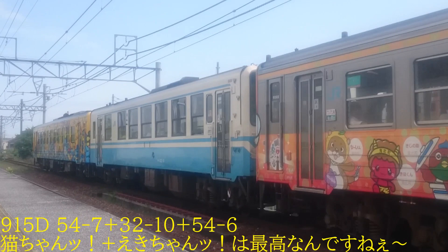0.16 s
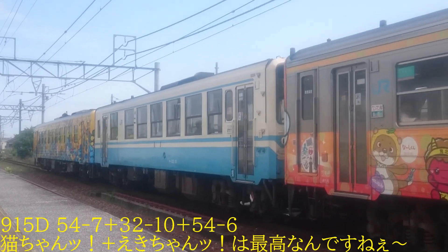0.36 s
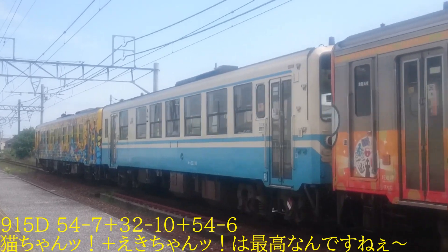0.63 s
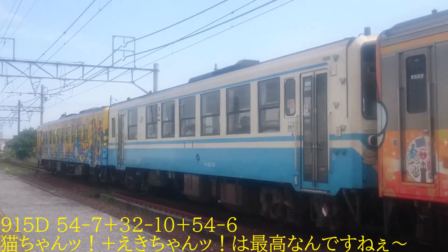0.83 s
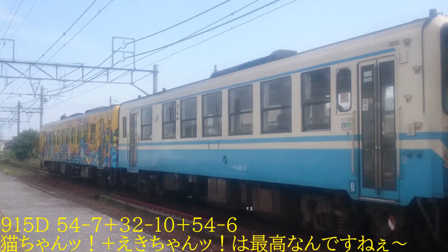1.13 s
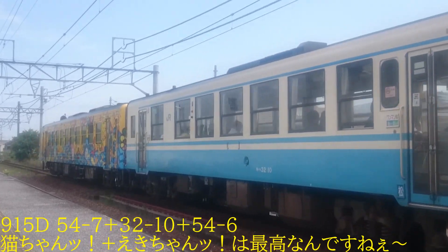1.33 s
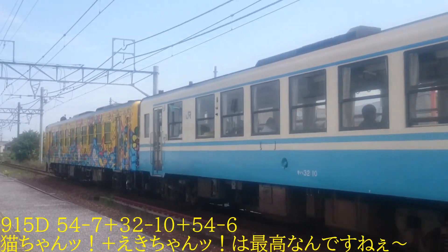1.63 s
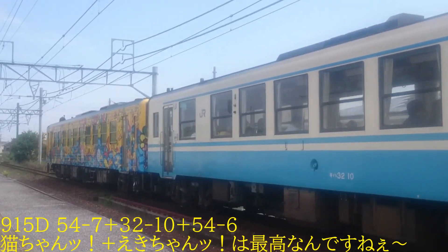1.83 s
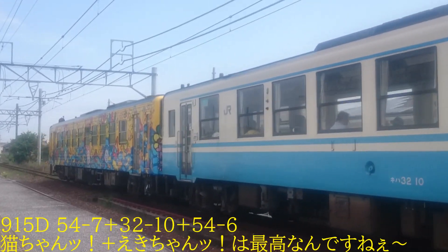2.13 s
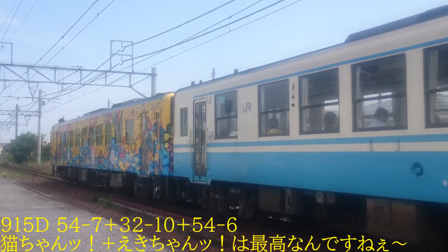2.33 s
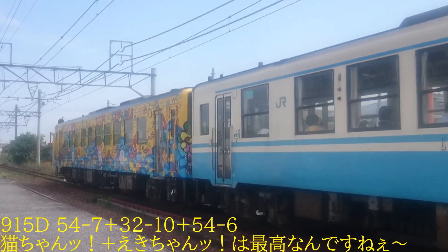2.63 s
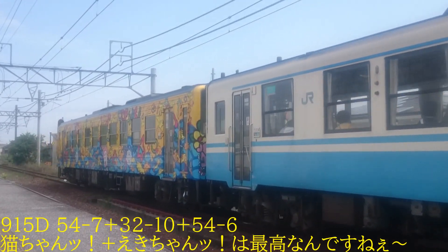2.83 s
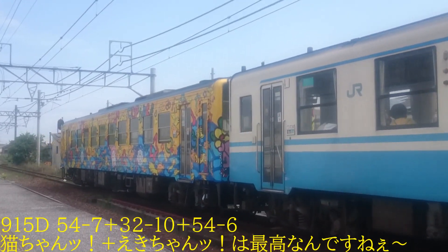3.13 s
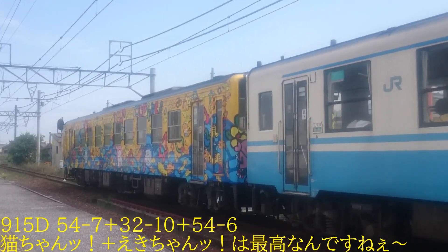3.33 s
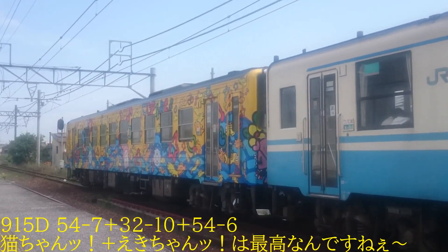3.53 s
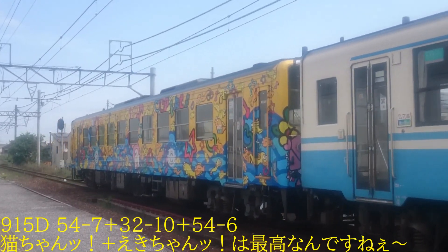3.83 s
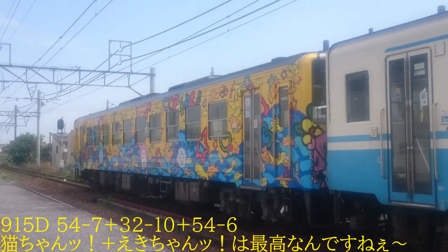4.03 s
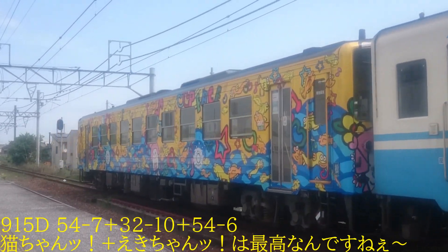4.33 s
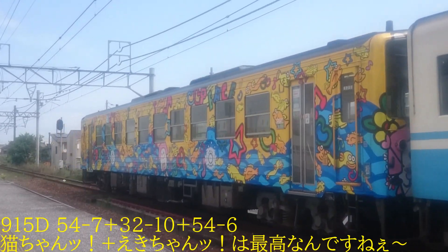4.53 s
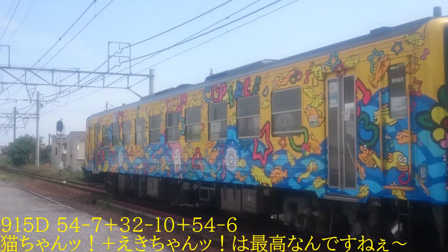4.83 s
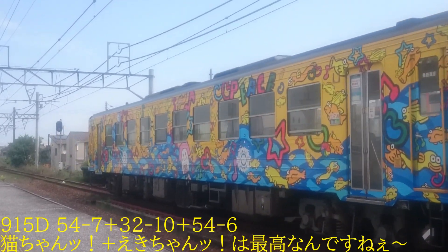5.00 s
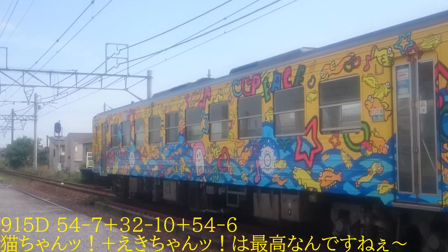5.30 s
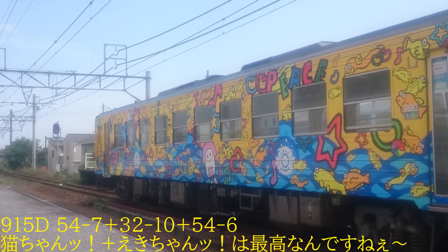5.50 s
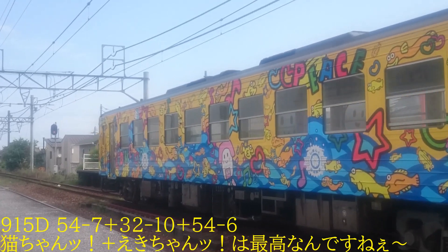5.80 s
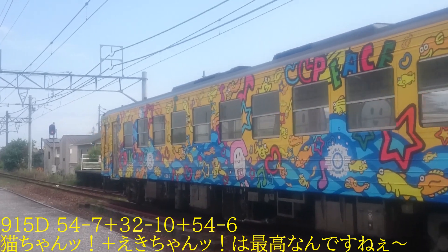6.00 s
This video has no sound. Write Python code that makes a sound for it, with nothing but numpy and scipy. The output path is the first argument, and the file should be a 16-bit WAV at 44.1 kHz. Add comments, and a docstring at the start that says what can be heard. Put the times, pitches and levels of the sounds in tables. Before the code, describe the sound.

Outdoors beside the track, a slowing diesel railcar train passes close to a stereo microphone. A loud, gritty engine roar with low exhaust booms and a few thumps comes first, then drops away to faint rolling noise. A rough, piercing wheel squeal swells up around one second and stays, fluttering and cutting out briefly, stronger on the left and slightly overloaded, with a buzzing chatter near the end.

```python
"""The wheels of a braking diesel railcar train squeal on one high mode close to a pair of microphone ports:
a thin tone in a rough halo of noisy modes, its octave, and sidebands when a brake block chatters.
Shaped noise makes the roar of an engine car that gives way to rolling noise, and the hiss of the brakes.
Wavering tones make exhaust drones, brief whines and one low drone; short damped rings make thumps and knocks.
The left port rings near the squeal and overloads."""
import sys
import numpy as np
from scipy import signal
from scipy.fft import next_fast_len
from scipy.io import wavfile
from scipy.ndimage import uniform_filter1d

SR = 44100
rng = np.random.default_rng(int(sys.argv[2]) if len(sys.argv) > 2 else 0)


def unload_wav(signal):
    """Save mono or channel-first audio to the path in sys.argv[1] as 16-bit WAV at rate SR, clipped to [-1, 1]."""
    wavfile.write(
        sys.argv[1],
        SR,
        np.round(np.clip(np.atleast_2d(signal).T, -1, 1) * 32767).astype(np.int16),
    )


def field_ratio(decibels):
    """Amplitude ratio for a level in dB (20 dB per decade); scalars and array-likes work."""
    return 10 ** (np.asarray(decibels, dtype=float) / 20)


N = 271656
TIME = np.arange(N) / SR
HOP = 256  # samples between noise frames
FRAMES, HZ = N // HOP + 5, np.fft.rfftfreq(1024, 1 / SR)
SQUEAL_LEAD, SQUEAL_ALIKE = 2.6, 0.65  # phase of the left port ahead in radians, likeness of the ports 0-1


def evened(x):
    """Scales to rms 1."""
    return x / np.sqrt(np.mean(abs(x) ** 2) + 1e-20)


def slow_unit(x):
    """Divides out the level over a quarter second, so that only faster beats remain."""
    return x / np.sqrt(uniform_filter1d(abs(x) ** 2, size=11000, axis=-1))


def read(points, hz):
    """Reads a spectrum table on a log-frequency axis."""
    f, value = np.transpose(points)
    return np.interp(np.log(hz + 1), np.log(f + 1), value)


def curves(rows, t):
    """Every column of a table, joined by straight lines in time."""
    s, *columns = np.transpose(rows)
    return [np.interp(t, s, c) for c in columns]


def swells(rest_db, rows, column):
    """Adds bell-shaped swells to the power of a resting level; rows start with center and length in seconds."""
    power = field_ratio(rest_db) ** 2 * np.ones(N)
    for row in rows:
        bell_db = row[column] - 24 * ((TIME - row[0]) / row[1]) ** 2
        power = power + field_ratio(bell_db) ** 2
    return 10 * np.log10(power)


def wobble(width_hz):
    """Complex noise of rms 1, smoothed twice: the envelope of noise in a resonance."""
    r = np.exp(-np.pi * width_hz / SR)
    z = rng.standard_normal(N) + 1j * rng.standard_normal(N)
    return evened(signal.lfilter([1], np.convolve([1, -r], [1, -r]), z))


def turning(hz):
    """A complex tone that follows a frequency."""
    return np.exp(2j * np.pi * np.cumsum(hz * np.ones(N)) / SR)


def ports(hz):
    """Complex gains of the two ports and their likeness, scaled so that the mean of the ports has power 1."""
    # Each row: frequency in Hz, level of the left port over the right in dB
    balance = [(60, -2.5), (200, -6.5), (500, -9.5), (1300, -7.5), (2400, -6.5), (3500, -3), (4500, -9.5),
               (5600, -7.5), (7500, 11), (9500, 15), (10800, -20), (12000, -35), (15000, -12)]
    # Each row: frequency in Hz, likeness of the ports from 0 to 1
    likeness = [(60, 0.66), (400, 0.91), (800, 0.89), (1500, 0.71), (3000, 0.07), (6000, 0), (10000, 0.1)]
    # Each row: frequency in Hz, phase of the left port ahead of the right in radians
    lead = [(0, 2.8), (260, 2.75), (950, 2.1), (1890, -.5), (3600, -4.1), (6600, -9.6), (11000, -24),
            (16000, -40)]
    left = field_ratio(read(balance, hz) / 2) * np.exp(1j * np.interp(hz, *np.transpose(lead)))
    right = 1 / abs(left)
    alike = np.clip(read(likeness, hz), 0, 1)
    mean = np.sqrt(abs(left) ** 2 + right ** 2 + 2 * alike * right * left.real) / 2
    return left / mean, right / mean, alike


def narrow(hz, sound):
    """Places one narrow complex sound on the two ports."""
    left, right, _ = ports(hz)
    return np.sqrt(2) * np.array([left * sound, right * sound]).real


def panned(db, pan_db):
    """Left and right gains of a squeal layer whose mean over the ports has the given level."""
    right = field_ratio(-pan_db)
    mean = np.sqrt(1 + right ** 2 + 2 * SQUEAL_ALIKE * np.cos(SQUEAL_LEAD) * right) / 2
    return field_ratio(db) * np.array([np.ones_like(right), right]) / mean


def noise(field_db, patchy_db):
    """Noise of a given level over frequency and time, with drifting patches, heard by both ports."""
    a, b, c, d, patches = rng.standard_normal((FRAMES, len(HZ), 5)).T
    patches = evened(uniform_filter1d(uniform_filter1d(patches, size=14, axis=0), size=10, axis=1))
    left, right, alike = (g[:, None] for g in ports(HZ))
    shared, own = a + 1j * b, c + 1j * d
    z = np.array([left * shared, right * (alike * shared + np.sqrt(1 - alike ** 2) * own)])
    z *= field_ratio(field_db + patchy_db * patches) * np.sqrt(3 / 2)  # the root makes up for overlapping windows
    return signal.istft(z, nperseg=1024, noverlap=1024 - HOP)[1][:, :N]


def band_level(db, lo_hz, hi_hz):
    """A spectrum shifted so that one band of it sums to 0 dB."""
    band = db[(HZ > lo_hz) & (HZ < hi_hz)]
    return db - 10 * np.log10(np.sum(field_ratio(band) ** 2))


def roar():
    """Engine roar gives way to rolling noise; the rumble and the hiss of the brake blocks swell on their own."""
    # Each row: time in seconds, roar level in dB, relative level of the rumble in dB
    train = [(0, -23.5, -5), (.41, -25, -1.5), (.93, -22.5, -8), (1.2, -26.5, -5.5), (1.36, -29, -4),
             (1.66, -37, -7), (2.03, -41, -7.5), (2.6, -42, -14.5), (2.92, -41.5, -11), (3.09, -38.5, -11),
             (3.36, -42, -10.5), (4.02, -40, -12), (4.2, -40.5, -9.5), (4.45, -40.5, -10),
             (4.72, -37, -8.5), (4.87, -42.5, -4.5), (5.3, -39.5, -5.5), (5.45, -41, -8.5),
             (6.0, -39.5, -3.5), (6.16, -42, -6.5)]
    # Each row: time in seconds, share of the engine car in the roar from 0 to 1
    nearness = [(0, 0.46), (1.3, 0.58), (2.1, 0.35), (6.16, 0.24)]
    # Spectrum shapes. Each row: frequency in Hz, relative density in dB
    engine_shape, rolling_shape, hiss_shape = [(21, -34), (35, -37), (70, -14), (156, 4.5), (356, -1.5),
                                               (421, 2), (629, -4), (863, -1), (1020, -10.5), (1130, -2.5),
                                               (1260, -5), (2690, -3), (3260, -8), (3770, -3),
                                               (5400, -16.5), (7020, -63), (11900, -120)], [(21, -44), (35, -36), (87, -0.5),
                                                                    (124, -14), (219, -11.5), (282, -7),
                                                                    (387, -9.5), (421, -8.5), (776, -4.5),
                                                                    (958, 1.5), (1290, -5), (3770, -6.5),
                                                                    (4560, -10.5), (4960, -15.5),
                                                                    (5400, -17.5), (7020, -43),
                                                                    (11900, -120)], [(4600, -30),
                                                                                     (5400, -2.5),
                                                                                     (7500, 4),
                                                                                     (9600, -1.5),
                                                                                     (10800, -19),
                                                                                     (12000, -7.5),
                                                                                     (14500, -20),
                                                                                     (15700, -15),
                                                                                     (16000, -85)]
    # Wheels and rail ring. Each row: frequency in Hz, width in Hz, height of the peak in dB
    body_rings = [(458, 28, 7), (920, 20, -4.5), (1120, 27, 4.5), (2407, 99, 4), (2660, 27, 7.5),
                  (3500, 300, 0.5)]
    # Each row: time in seconds, brake hiss over the roar in dB
    brake_hiss = [(0, -14.5), (.8, -15.5), (.97, -10.5), (1.3, -10), (1.8, -15.5), (2.3, -10.5),
                  (2.7, -21.5), (3.1, -14.5), (3.6, -20), (4.2, -17.5), (4.7, -13), (5.2, -23), (6.16, -18)]

    t = np.arange(FRAMES) * HOP / SR
    level_db, rumble_db = curves(train, t)
    flutter = evened(uniform_filter1d(rng.standard_normal(FRAMES), size=9))
    level_db = level_db + 0.63 * flutter
    near = np.clip(curves(nearness, t)[0], 0, 1)
    rings = sum(db / (1 + (2 * (HZ - hz) / width) ** 2) for hz, width, db in body_rings)
    engine = band_level(read(engine_shape, HZ) + rings, 300, 4500)[:, None]
    rolling = band_level(read(rolling_shape, HZ) + rings, 300, 4500)[:, None]
    low = np.clip((1100 - HZ) / 600, 0, 1)[:, None]  # the rumble: whole below 500 Hz, none above 1100 Hz
    body = near * engine + (1 - near) * rolling + low * 0.65 * (rumble_db - rumble_db.mean())
    hiss = band_level(read(hiss_shape, HZ), 8300, 10000)[:, None] + curves(brake_hiss, t)[0]
    return noise(body + level_db, patchy_db=1.04) + noise(hiss + level_db, patchy_db=1.1)


def exhaust():
    """Low firing orders of the engine, each a wavering drone that booms up briefly."""
    # Each row: frequency in Hz, width of the wavering in Hz
    drones = [(72, 8.2), (97, 37)]
    # Each row: time in seconds, relative levels of the low and the high drone in dB
    drone_levels = [(0, -60, -45.5), (1.4, -52, -43), (1.75, -57, -54), (2.2, -64.5, -77),
                    (2.55, -78, -70.5), (3.15, -58, -58), (3.9, -73, -70), (4.6, -67, -56), (5.2, -71, -61),
                    (6.16, -55, -55.5)]
    # Each row: center in seconds, length in seconds, relative levels of the low and the high drone in dB
    booms = [(0.113, 0.11, -27.5, -47), (.41, .08, -38, -55), (0.812, 0.087, -48, -40),
             (1.127, .14, -40, -54), (5.31, .14, -66, -52.5), (5.62, 0.093, -77, -45),
             (5.894, 0.11, -49, -56.5)]
    out = np.zeros((2, N))
    for k, ((hz, width), rest_db) in enumerate(zip(drones, curves(drone_levels, TIME))):
        level = field_ratio(swells(rest_db, booms, column=2 + k) - 1.0)
        out += narrow(hz, level * (1.13 + 0.79 * wobble(width)) * turning(hz))
    return out


def tone_and_halo():
    """Envelopes of the squeal at both ports: a thin tone, and other wheels that beat against it as a halo."""
    # Each row: time in seconds, relative levels of the thin tone and of the rough halo in dB
    levels = [(0, -42, -32), (.5, -37.5, -33.5), (.62, -42, -26.5), (1.0, -29, -18), (1.45, -18.5, -17.5),
              (1.62, -15, -17.5), (1.84, -32, -19), (1.94, -14, -16.5), (2.45, -14.5, -19),
              (2.65, -27.5, -17.5), (3.0, -24, -19.5), (3.75, -21, -18), (4.0, -24, -19),
              (4.35, -23.5, -18.5), (4.85, -17, -21.5), (5.0, -24, -19), (5.2, -24.5, -18.5),
              (5.5, -23.5, -20), (6.16, -26, -21.5)]
    # The tone flares up briefly. Each row: center in seconds, length in seconds, relative level in dB
    flares = [(0.59, 0.067, -22), (0.746, 0.018, -19), (0.824, 0.083, -18), (0.97, 0.02, -21),
              (1.17, 0.066, -15.5), (1.58, 0.026, -25), (1.775, 0.02, -18), (1.873, 0.027, -13),
              (2.71, 0.036, -10), (2.846, 0.04, -13.5), (3.097, 0.027, -12.5), (3.182, 0.078, -18),
              (3.388, 0.017, -20), (3.504, 0.028, -9.5), (4.074, 0.017, -9.5), (4.151, 0.021, -10),
              (4.4, 0.045, -12.5), (4.545, 0.032, -19.5), (4.777, 0.058, -16), (5.014, 0.029, -14.5),
              (5.328, 0.062, -13), (5.54, 0.067, -20), (5.649, 0.031, -12), (5.734, 0.081, -12.5),
              (5.935, 0.042, -14.5), (6.041, 0.03, -15.5), (6.128, 0.053, -10.5)]
    # The tone drops out briefly. Each row: center in seconds, length in seconds, depth in dB
    dropouts = [(0.686, 0.044, 6), (1.664, 0.021, 14.5), (1.825, 0.033, 6.5), (2.726, 0.016, 7.5),
                (2.814, 0.025, 5.5), (3.428, .03, 9), (3.55, .05, 11), (4.005, .06, 7.5),
                (4.103, .02, 15.5), (4.222, 0.035, 12), (4.455, 0.058, 13.5), (4.583, .04, 5),
                (4.931, 0.056, 4), (5.031, 0.037, 9), (5.584, 0.029, 8), (5.718, 0.027, 11.5),
                (5.881, 0.041, 4), (6.083, .04, 2.5)]
    # Each row: distance from the tone in Hz, width in Hz, relative level in dB
    halo_modes = [(45, 35.5, -0.5), (95, 62, -2), (-70.5, 67, -7), (32.5, 160, -8.5), (195.5, 780, -22)]
    # Each row: time in seconds, left port over right in dB ahead of the fades
    squeal_pan = [(0, 11), (.4, 5), (1.2, 11.5), (1.6, 13.5), (2.2, 18), (2.6, 11), (3.55, 17), (4.1, 13),
                  (5.2, 13), (6.16, 12.5)]

    (rest_db, halo_db), pan = curves(levels, TIME), curves(squeal_pan, TIME)[0]
    tone_db = swells(rest_db, flares, column=2)
    out_db = sum(db * np.exp(-4 * ((TIME - s) / length) ** 2) for s, length, db in dropouts)
    flicker_db = 3.5 * wobble(17.4).real  # the halo flickers at random
    fades_db = tone_db - uniform_filter1d(tone_db, size=13000)
    halos = [evened(sum(field_ratio(db) * wobble(width) * turning(off) for off, width, db in halo_modes))
             for _ in range(2)]
    halos[1] = SQUEAL_ALIKE * halos[0] + np.sqrt(1 - SQUEAL_ALIKE ** 2) * halos[1]
    tone = np.array([1 + 0.3 * wobble(25), 0.65 + 0.6 * wobble(30)])
    # the right port hears only part of each fade
    shape = panned(tone_db + 1.0 - out_db, pan + 0.96 * fades_db) * tone
    # the halo drops out less deeply than the tone
    shape = shape + panned(halo_db + 2.5 + flicker_db - 0.65 * out_db, pan) * np.array(halos)
    shape[1] *= np.exp(-1j * SQUEAL_LEAD)
    return shape


def chatter(mode):
    """A chattering brake block chops the squeal: sidebands ride on a thin tone, not on the halo."""
    # Each row: multiple of the squeal frequency, multiple of the chatter frequency
    sidebands = [(1, 1), (1, -1), (1, -2), (1, 3), (2, -2), (2, -1), (2, 1), (2, 2)]
    # One row for each sideband: left and right levels in dB, relative to the chatter at its strongest
    sideband_levels = [(6.5, -8), (2.5, -4), (-18, 0), (-19, -37.5), (-37.5, -15), (-27, -17), (-38, -24),
                       (-50, -35)]
    # Each row: center in seconds, length in seconds, base levels of upper and lower sidebands in dB
    bouts = [(3.76, .08, -54, -62), (4.085, 0.16, -43.5, -50.5), (4.448, .3, -43.5, -56),
             (4.667, .2, -33, -38), (4.832, 0.12, -47, -56), (5.13, .3, -51, -66.5),
             (5.337, 0.091, -44, -48), (5.578, .08, -54, -68)]
    upper_db, lower_db = (swells(-72, bouts, column) for column in (2, 3))
    chop = turning(912 + 8 * wobble(8.5).real)  # Hz
    thin = mode * evened(0.7 + 0.7 * wobble(160))
    out = 0
    for (m, k), db in zip(sidebands, sideband_levels):
        chatter_db = upper_db if k > 0 else lower_db
        weak_db = chatter_db - chatter_db.max()
        far_db = weak_db * (abs(k) ** 0.51 - 1)  # far sidebands fade faster than near ones
        out = out + field_ratio(np.array(db)[:, None] + chatter_db + far_db) * thin ** m * chop ** k
    return out


def squeal(rumble):
    """Stick-slip holds a wheel mode ringing; the contact doubles and chops it, and the left port overloads."""
    # The squealing mode dips, then creeps up as the train slows. Each row: time in seconds, frequency in Hz
    pitch = [(0, 6700), (.5, 6688), (1.6, 6684), (2.3, 6689), (3.6, 6707), (4.8, 6716), (6.16, 6723)]
    # Each row: time in seconds, relative level of the octave in dB, left port over right in dB
    octave_levels = [(0, -64, -12), (.6, -54, -8.5), (1.0, -52, -6), (1.5, -48, 1), (1.85, -46, -10),
                     (1.97, -31, 8.5), (2.08, -40.5, 2.5), (2.38, -42, -4), (2.5, -46, -7),
                     (3.2, -44.5, -9), (4.45, -51, -5.5), (4.6, -51, -7), (5.3, -50, -6.5), (6.16, -50, -4)]
    # Splatter of the overloaded left port. Each row: time in seconds, relative level in dB
    overdrive = [(0, -75), (1.05, -66), (1.15, -52), (1.6, -68), (1.9, -62), (1.97, -46), (2.05, -51),
                 (2.38, -51), (2.45, -62), (2.8, -66), (6.16, -70)]

    mode = turning(curves(pitch, TIME)[0])
    shape = tone_and_halo()
    fundamental = slow_unit(shape) * mode
    doubled = fundamental ** 2 / abs(fundamental) ** 1.2  # the octave follows the beats of the fundamental
    octave_db, octave_pan = curves(octave_levels, TIME)
    octave_gain = field_ratio(octave_db + 5.0) * np.sqrt(2 / (1 + field_ratio(np.array([-2 * octave_pan, 2 * octave_pan]))))
    out = shape * mode + octave_gain * doubled + chatter(mode)
    # the overdriven left port mixes squeal and octave with the ring of the rolling noise
    ring = slow_unit(signal.lfilter(*signal.butter(1, [700, 1600], "band", fs=SR), rumble[0]))
    splatter = ring * (doubled[0] + field_ratio(7.5) * fundamental[0])
    out[0] += field_ratio(curves(overdrive, TIME)[0] + 9.0) * splatter
    return np.sqrt(2) * out.real


def thumps_and_knocks():
    """Thumps and knocks: short damped rings, low or mid-pitched, roughened by noise, with a soft start."""
    # Each row: start in seconds, relative level in dB, frequency in Hz, time to decay by 60 dB in seconds
    hits = [(0.216, -23, 123, 0.15), (.223, -22, 280, .12), (.575, -18.5, 616, .08), (.578, -23, 108, 0.31),
            (1.968, -41, 120, 0.16), (1.99, -38.5, 60.7, 0.19), (2.025, -44, 85.5, .15),
            (5.05, -33, 846, 0.057), (5.13, -30.5, 680, .05), (5.91, -37, 650, 0.061)]
    out = np.zeros((2, N))
    for s, db, hz, t60 in hits:
        u = np.maximum(TIME - s, 0)
        envelope = field_ratio(db - 60 * u / t60) * (1 - np.exp(-u / 0.0058))
        out += narrow(hz, envelope * np.exp(2j * np.pi * hz * u) * (1 + 0.5 * wobble(hz)))
    return out


def whines():
    """Brief whines and one low drone: fuzzy tones that swell and fade."""
    # Each row: start in seconds, length in seconds, frequency in Hz, width in Hz, relative level in dB
    whine_rows = [(3.52, .24, 3870, 50, -57), (3.85, .24, 2640, 60, -49.5), (3.86, .24, 4130, 70, -55),
                  (.88, .16, 3650, 200, -35), (3.17, .18, 3870, 50, -58), (3.0, .14, 3620, 150, -52),
                  (2.2, .06, 3500, 150, -44), (4.95, .8, 5000, 100, -63), (5.4, .7, 194, 10, -57.5),
                  (1.05, .4, 2660, 70, -39.5)]
    out = np.zeros((2, N))
    for s, length, hz, width, db in whine_rows:
        swell = np.sin(np.pi * np.clip((TIME - s) / length, 0, 1))
        out += narrow(hz, field_ratio(db) * swell * (0.17 + 1.64 * wobble(width)) * turning(hz))
    return out


def scene():
    """Sums the whole train; the squeal also takes in the roar, which rings in the overloaded port."""
    rumble = roar()
    return rumble + exhaust() + squeal(rumble) + thumps_and_knocks() + whines()


def roll_off(x):
    """The treble ends steeply here."""
    return signal.sosfilt(signal.butter(12, 15570, fs=SR, output="sos"), x)


def record(dry):
    """An instant limiter flattens the envelope of each channel."""
    envelope = abs(signal.hilbert(dry, next_fast_len(N))[:, :N])
    knee, ceiling = 5.0, 0.93  # exponent (higher is harder), full scale is 1
    limited = dry / (1 + (envelope / ceiling) ** knee) ** (1 / knee)
    return roll_off(limited)


dry = scene()
out = record(dry)
unload_wav(out)
```